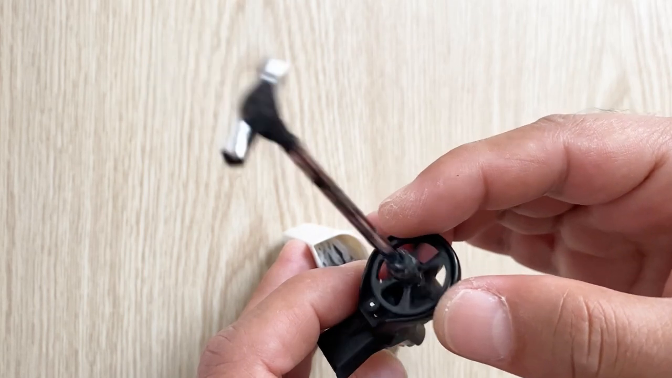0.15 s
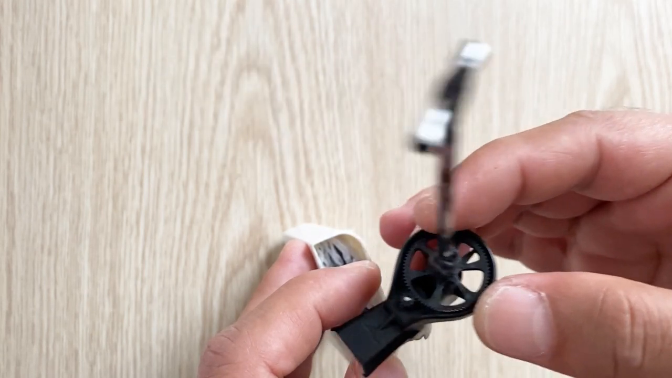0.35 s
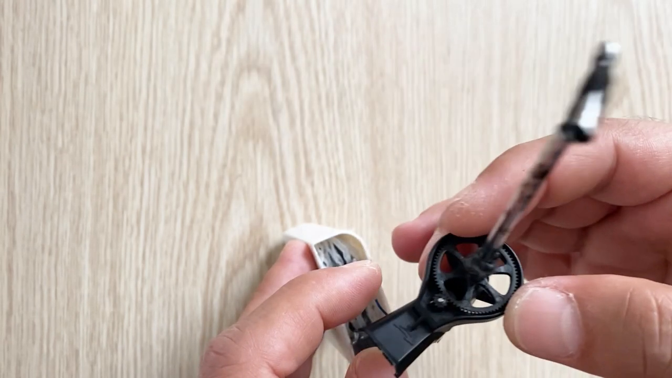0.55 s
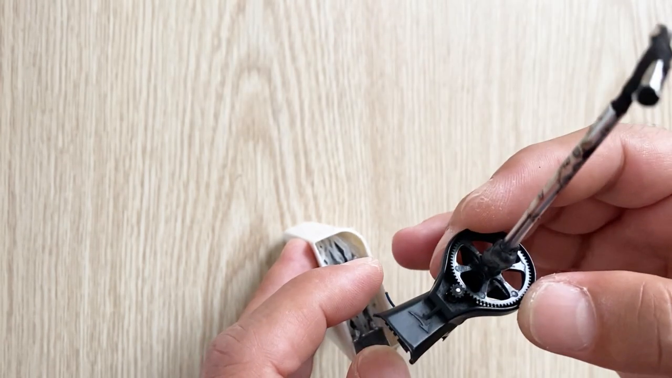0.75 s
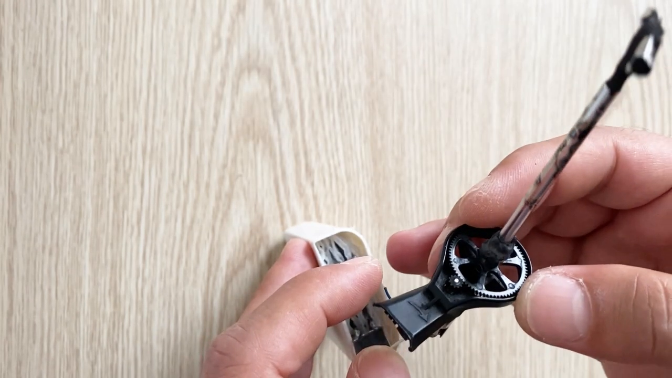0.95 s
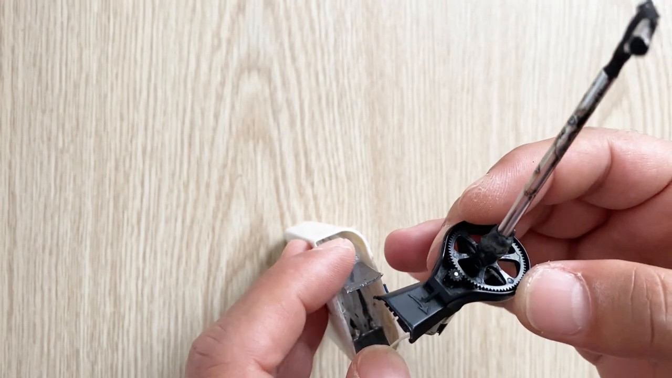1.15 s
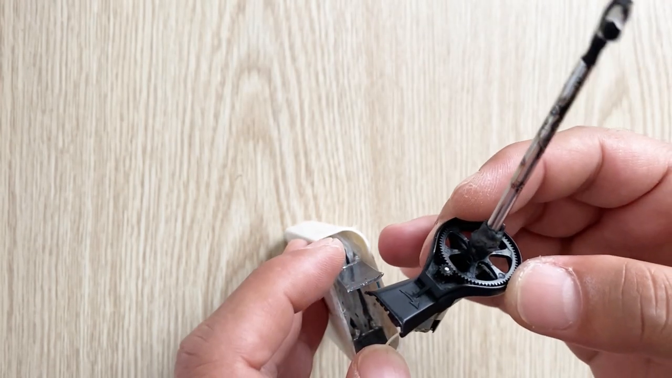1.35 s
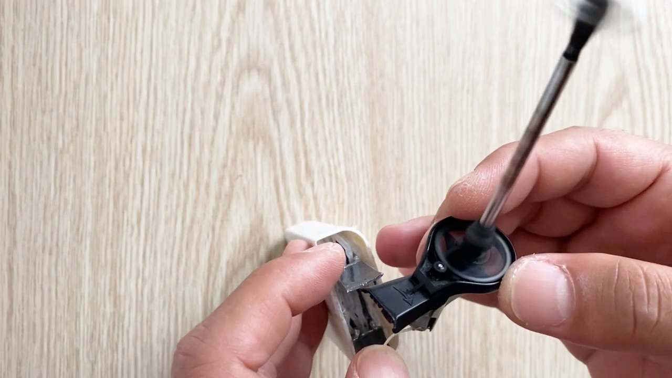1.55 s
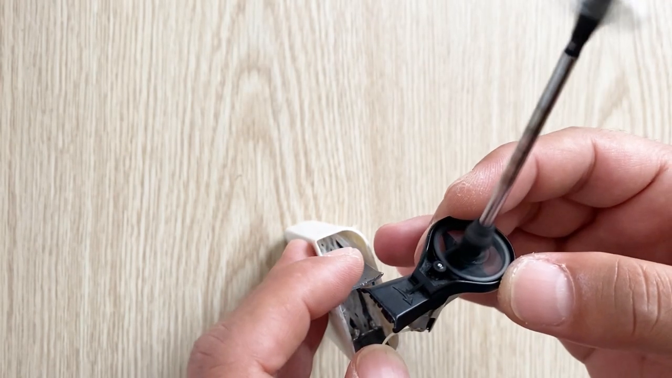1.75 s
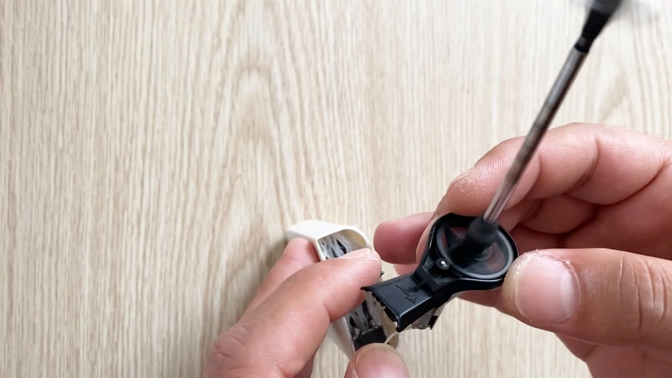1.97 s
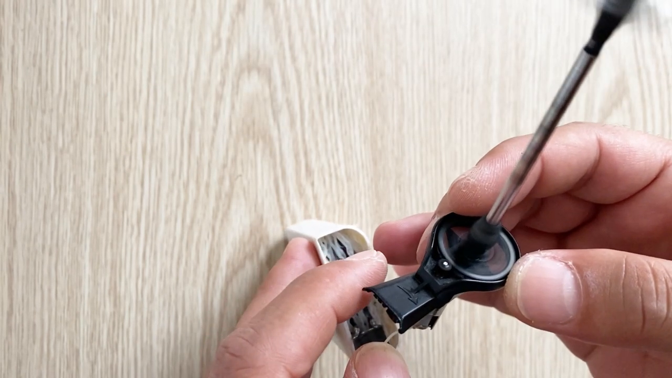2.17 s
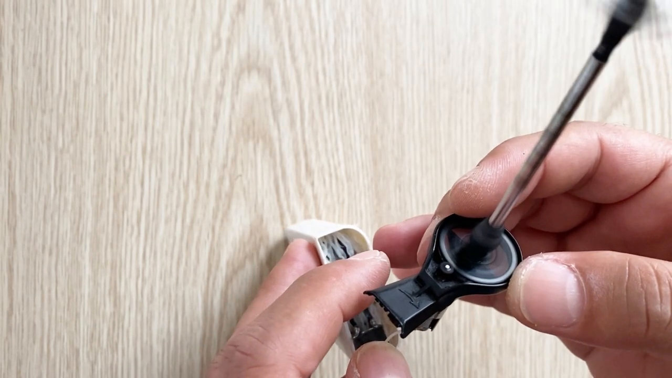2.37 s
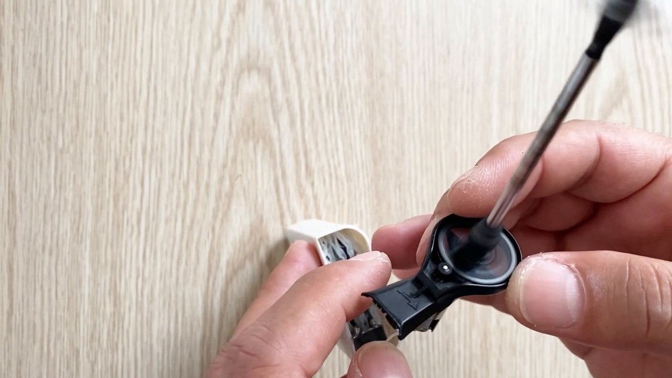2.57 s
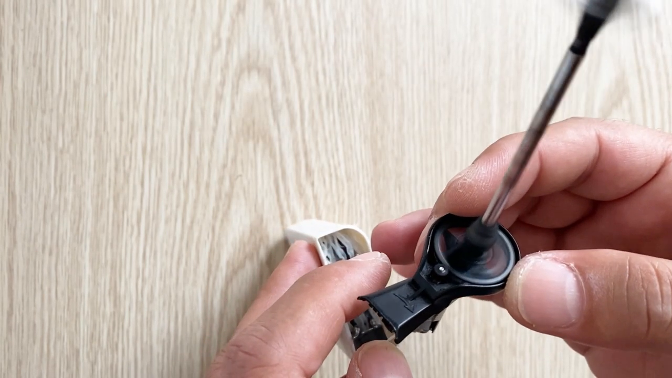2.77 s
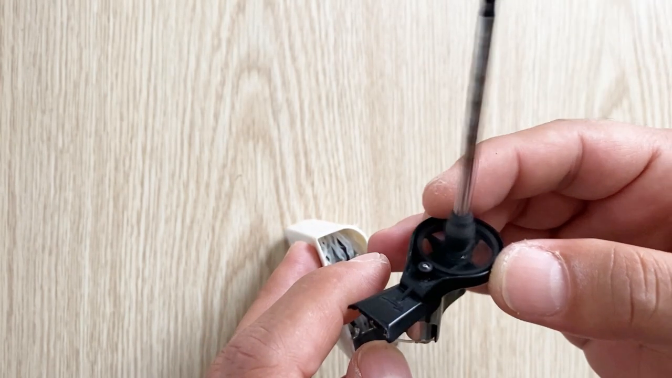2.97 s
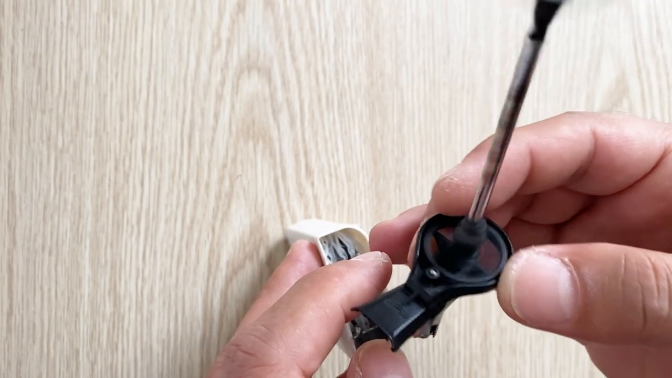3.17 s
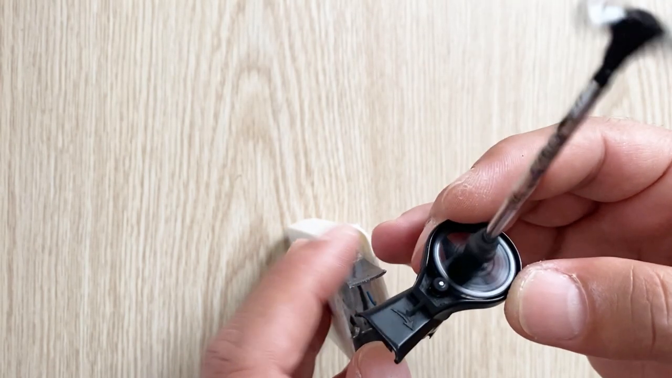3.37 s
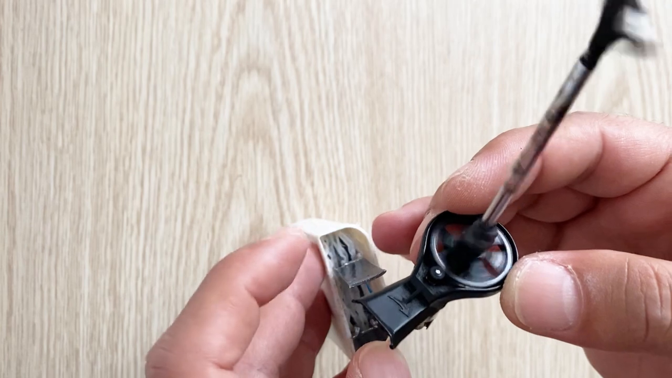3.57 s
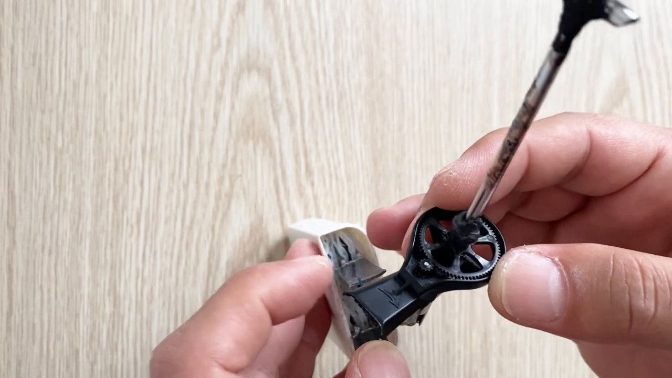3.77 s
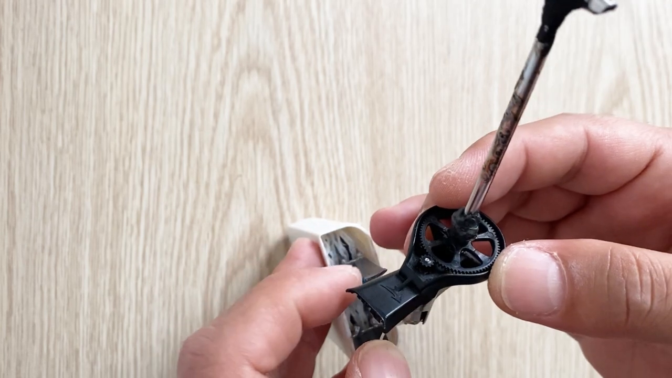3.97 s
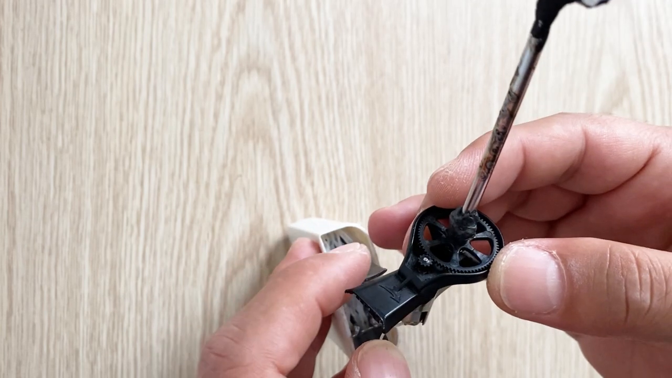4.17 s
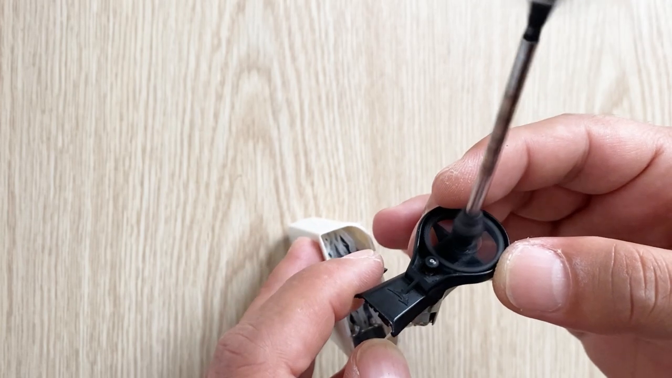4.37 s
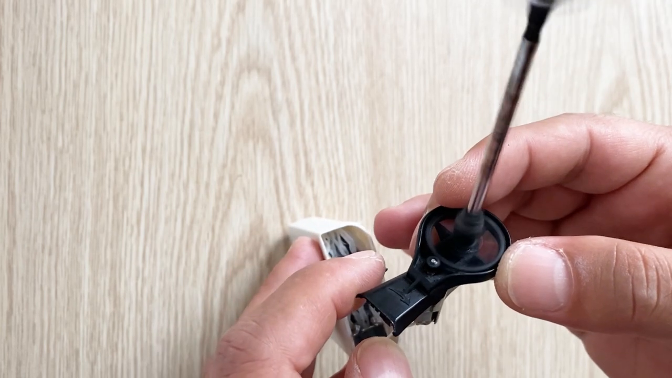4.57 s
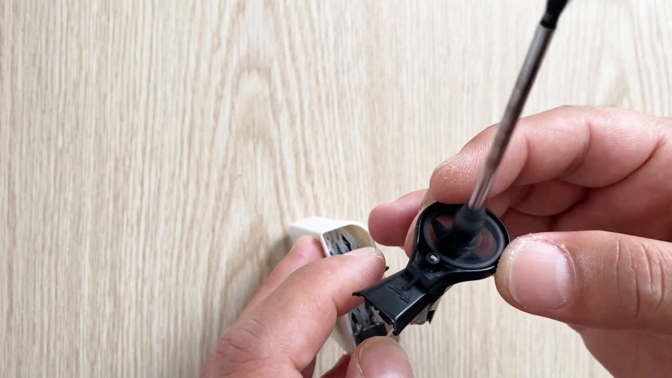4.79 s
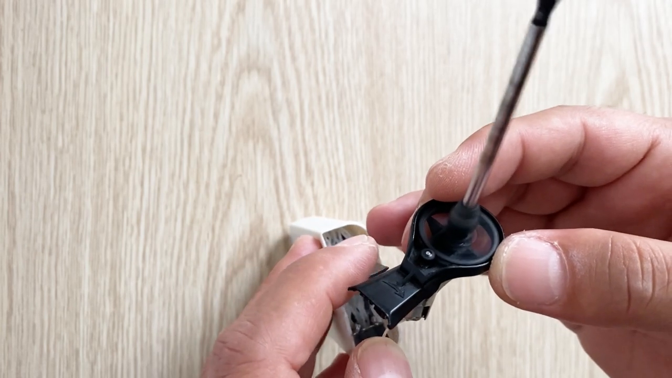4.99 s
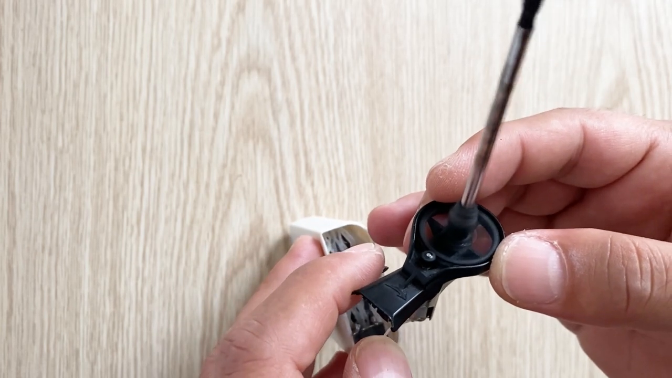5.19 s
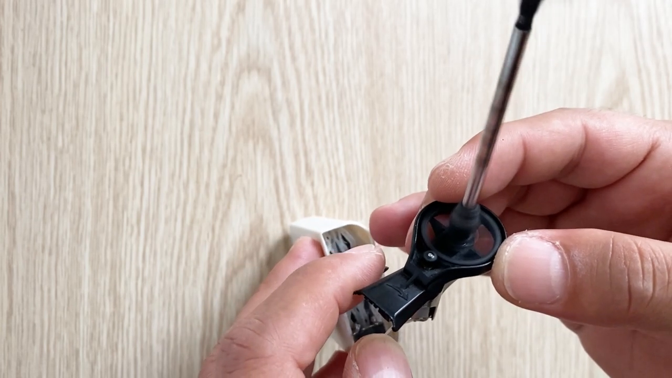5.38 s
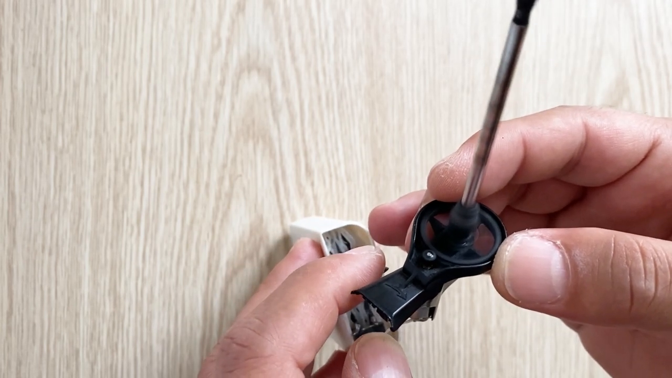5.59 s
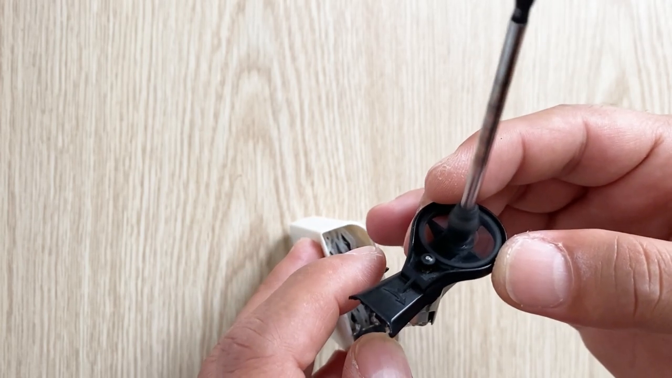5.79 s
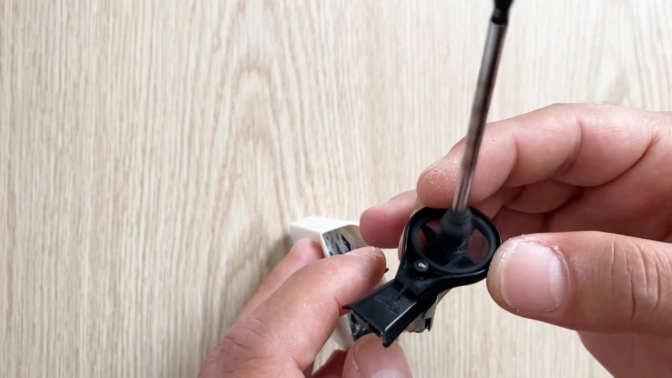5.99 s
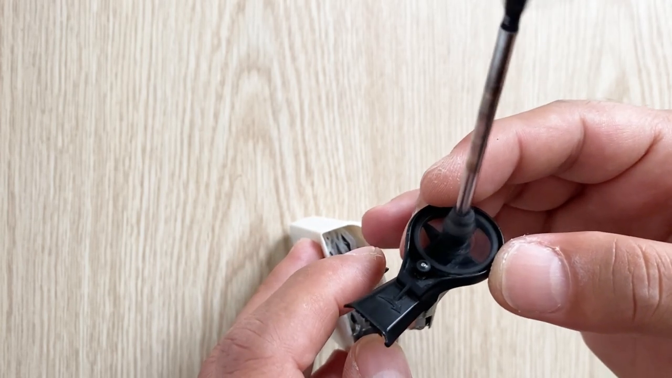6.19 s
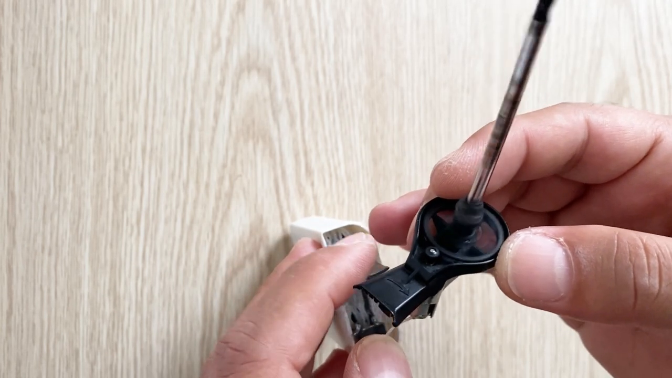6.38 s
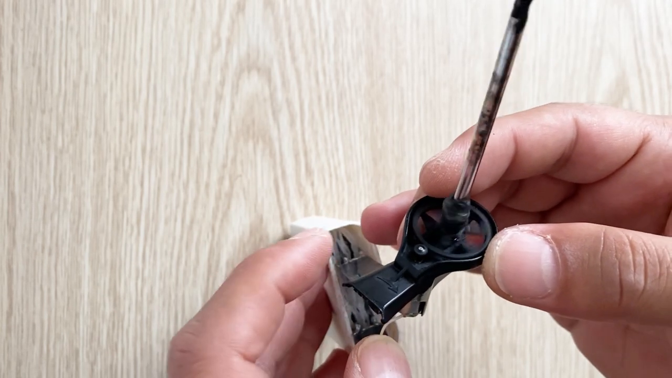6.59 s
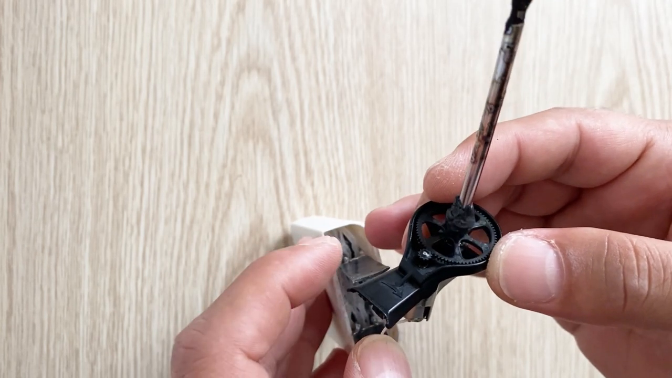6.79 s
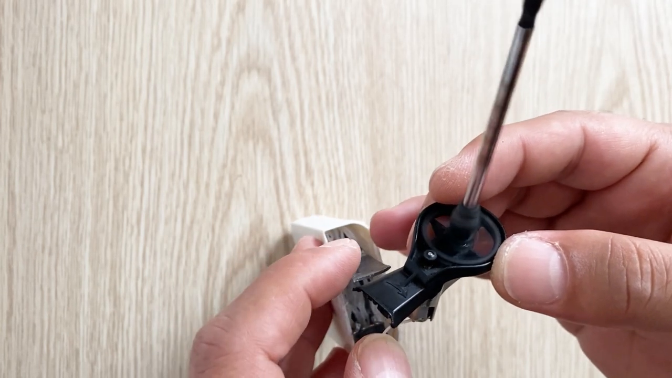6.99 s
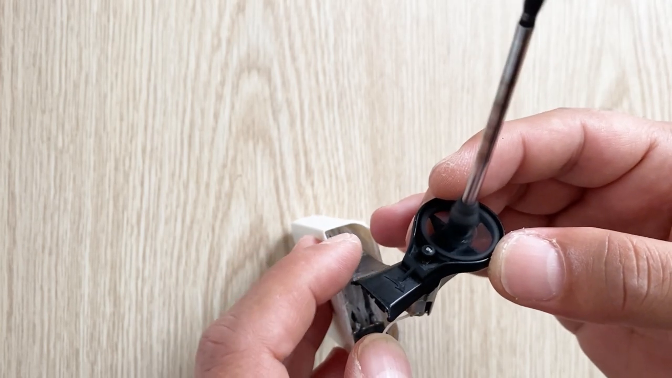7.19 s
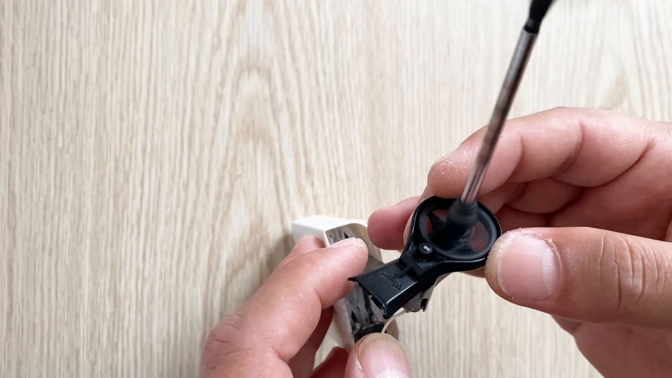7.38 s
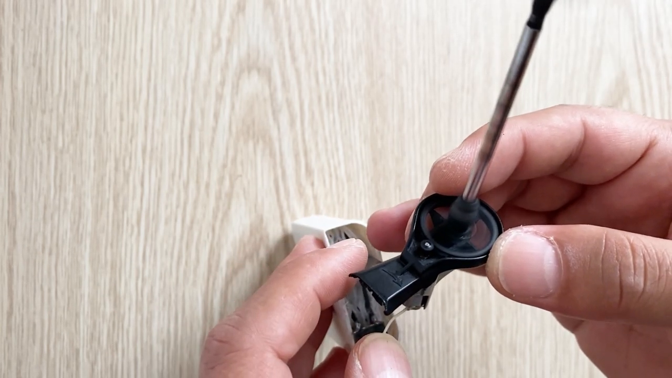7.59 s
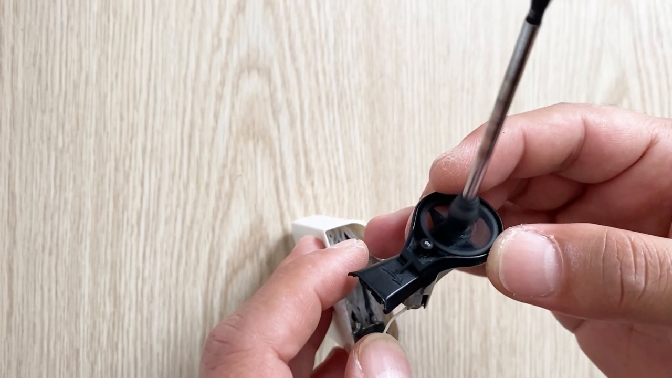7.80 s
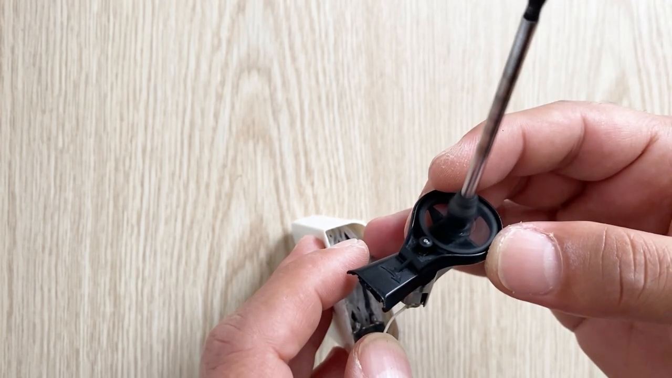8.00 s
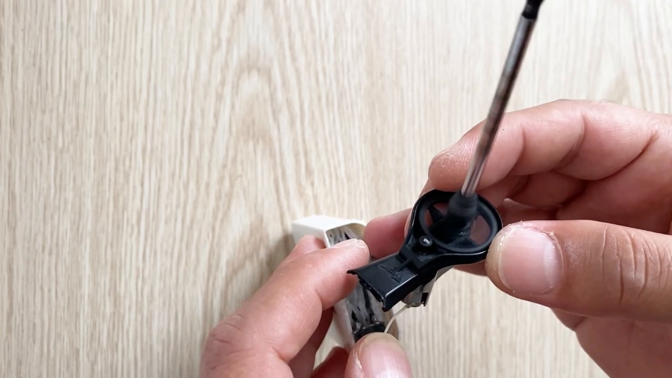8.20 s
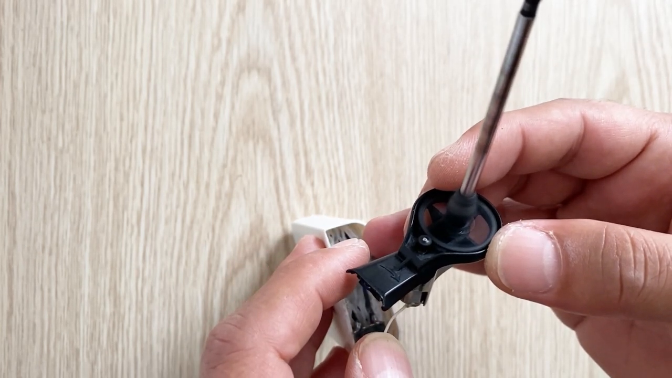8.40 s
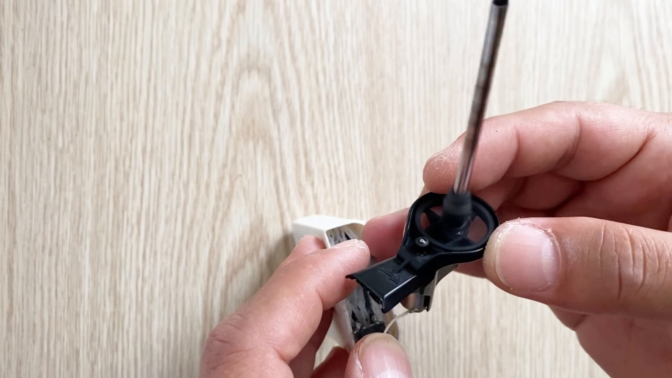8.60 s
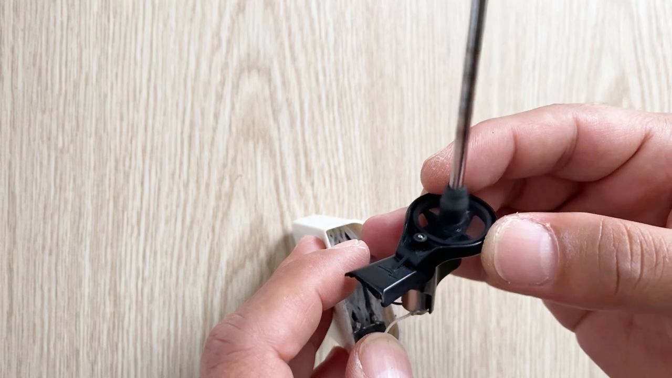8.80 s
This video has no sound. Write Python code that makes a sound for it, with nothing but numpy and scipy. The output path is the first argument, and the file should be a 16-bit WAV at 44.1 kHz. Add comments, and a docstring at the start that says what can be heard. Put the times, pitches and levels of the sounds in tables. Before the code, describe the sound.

A close, dry indoor sound of a tiny bare motor driving a plastic toy blender wheel. At 0 seconds there is a light scrape, then faint finger ticks over low room rumble until 1.4. The motor snaps on: bright gear hiss, dense clicking and whine pulse rapidly with the wobbling wheel, dipping near 1.6 and continuing to 2.65, with a short boost around 2.8. It coasts down, teeth knocking hard near 3.1, chattering slower to quiet by about 3.7 amid ticks and swelling rumble. A brief jerk at 4.3 and sharp knock near 4.5 lead to another run from 4.7, sagging, knocking at 5.1, then reviving from 5.2 to 5.75. It slows to a crawling rattle, with a scrape around 6.5. A nudge at 6.8 precedes the longest steady grinding whirr, 7.0 to 8.75, with a tiny dip near 8.5, before it begins slowing at the end.

```python
"""Toy blender gear drive

A tiny electric motor, held bare in the hands close by, spins a plastic crown wheel with a long blender shaft.
A finger works the battery contact: three runs, with dips and coasting stops, each following the wheel's speed.
The wheel wobbles, so its teeth, made of clicks, hiss and whining tones, grind on the pinion once a turn.
Knocks, scrapes and small handling ticks are fading noise bursts; low rumble and drone fill a small room."""
import sys
import numpy as np
from scipy import signal
from scipy.fft import rfft, irfft, next_fast_len
from scipy.io import wavfile
from scipy.ndimage import uniform_filter1d

SR = 44100
rng = np.random.default_rng(int(sys.argv[2]) if len(sys.argv) > 2 else 0)


def bounce(signal):
    """Save signal as a 16-bit WAV file at the path given by the first command-line argument."""
    frames = np.transpose(np.atleast_2d(signal))
    limited = np.clip(frames, -1, 1)
    pcm = np.round(limited * 32767).astype(np.int16)
    wavfile.write(sys.argv[1], SR, pcm)


N = 390285  # length in samples


def from_db(db):
    """Turn decibels into gain."""
    return 10 ** (np.asarray(db) / 20)


def rms_one(x):
    """Scale to an rms of 1."""
    return x / np.sqrt(np.mean(x ** 2) + 1e-20)


def in_time(rows, column):
    """Read one column of a table as a curve with a value at every sample."""
    rows = np.array(rows)
    return np.interp(np.arange(N) / SR, rows[:, 0], rows[:, column])


def drift(rate):
    """Wander at random with about `rate` new values a second, joined by straight lines; rms 1."""
    values = rng.standard_normal(N)
    return rms_one(np.interp(np.arange(N) / SR * rate, np.arange(N), values))


def colour(x, spectrum):
    """Filter by a smooth spectrum that falls steeply beyond both its ends; rms 1."""
    hz, db = np.transpose(spectrum)
    size = next_fast_len(N + 4096)
    log_hz = np.log(np.fft.rfftfreq(size, 1 / SR) + 1)
    beyond = np.abs(log_hz - np.clip(log_hz, np.log(hz[0]), np.log(hz[-1])))
    gain = from_db(np.interp(log_hz, np.log(hz), db) - 60 * beyond)
    return rms_one(irfft(rfft(x, size) * gain, size)[..., :N])


def resonate(x, modes):
    """Let each resonance in turn ring on top of what passes through; a wider one dies sooner; rms 1."""
    for hz, width, boost_db in modes:
        r = np.exp(-np.pi * width / SR)
        feed = np.array([1, 0, -1]) * (1 - r * r) / 2
        ring = [1, -2 * r * np.cos(2 * np.pi * hz / SR), r * r]
        peak = signal.lfilter(feed, ring, x + 1e-18)
        x = x + (from_db(boost_db) - 1) * peak
    return rms_one(x)


def ambient(spectrum, side_db):
    """Stereo noise: a part shared by both sides plus a part that is opposite on them."""
    mid, side = rng.standard_normal((2, N))
    return colour(mid + from_db(side_db) * side * np.array([[1], [-1]]), spectrum)


# How the room background swells and sinks.
# Each row: time in seconds, rumble level in dB, drone level in dB, both before a small trim.
BACKGROUND_LEVELS = [(0.3, -68.5, -62), (1.08, -59, -54.5), (2.3, -59.5, -59), (3.7, -52.5, -43.5),
                     (4.06, -58, -52), (4.92, -56, -54), (5.06, -52.5, -60), (5.32, -59, -58.5),
                     (8.85, -65.5, -60.5)]
# The noise colours of the background, from deep drone to hiss.
# Each row of these four: frequency in Hz, relative level in dB.
DRONE_COLOUR = [(24, -27), (36, -3.5), (52, 1), (64, -6), (78, 1), (100, -9), (122, -16.5)]
RUMBLE_COLOUR = [(105, 0.5), (125, -5), (155, 0.5), (200, -5), (262, 0.5), (290, -5.5), (335, -18),
                 (420, -20)]
RUSH_COLOUR = [(250, -1.5), (400, -7), (700, -9), (1100, -25.5), (2000, -32.5), (5000, -47.5)]
HISS_COLOUR = [(500, 2), (2000, -4), (5500, -8), (7200, -14.5), (9000, -9.5), (12000, -11), (13500, -15.5),
               (16000, -11.5)]
# Low resonances of the room. Each row: frequency in Hz, width in Hz, boost in dB.
ROOM_RESONANCES = [(73.7, 1.7, 8), (92, 12, 11), (143.3, 21, 3), (169.8, 5.2, 10.5), (204.6, 13, 7),
                   (229, 2.8, 8), (253.6, 6.5, 6)]


def background():
    """Noise shaped into rumble, drone and soft rush, which swell and sink over a steady faint hiss."""
    rumble_db, drone_db = in_time(BACKGROUND_LEVELS, 1), in_time(BACKGROUND_LEVELS, 2)
    rumble = from_db(rumble_db + 1.54) * resonate(ambient(RUMBLE_COLOUR, side_db=-19.0), ROOM_RESONANCES)
    drone = from_db(drone_db - 0.17) * resonate(ambient(DRONE_COLOUR, side_db=-31), ROOM_RESONANCES)
    rush = from_db(rumble_db - 17.0) * ambient(RUSH_COLOUR, side_db=-3.0)
    hiss = from_db(-86.0) * ambient(HISS_COLOUR, side_db=0)
    return rumble + drone + rush + hiss


def room(x, t60, wet_db):
    """A short diffuse tail of fading noise, different at each side; it falls by 60 dB in t60 seconds."""
    t = np.arange(SR // 2) / SR
    tail = rng.standard_normal((2, len(t))) * from_db(-60 * t / t60) * (t > .002)
    tail /= np.sqrt(np.sum(tail ** 2, axis=1, keepdims=True))
    return from_db(wet_db) * signal.fftconvolve(x[None], tail, axes=1)[:, :N]


def hand_scatter(x):
    """The shifting hands scatter the sound: two very short tails trade places at random."""
    pose = 2 * drift(7)
    shares = np.cos(pose), np.sin(pose)
    return sum(share * room(x, t60=.02, wet_db=-11.0) for share in shares)


# How far the left side runs ahead of the right.
# Each row: frequency in Hz, lead of the left in radians.
LEFT_LEAD = [(2200, 0), (2600, .6), (3700, .2), (5300, .1), (6000, 1.5), (6900, 2.9), (7900, 3.5),
             (9800, 6.0), (10900, 6.5), (13200, 9.2), (16000, 11.9)]


def left_first(x):
    """The treble reaches the left side before the right: half the lead forward, half backward."""
    size = next_fast_len(N + 4096)
    lead = np.interp(np.fft.rfftfreq(size, 1 / SR), *np.transpose(LEFT_LEAD))
    both_sides = np.exp(.5j * lead * np.array([[1], [-1]]))
    return irfft(rfft(x, size) * both_sides, size)[:, :N]


# Resonances of wheel and frame. Each row: frequency in Hz, width in Hz, boost in dB.
FRAME_RESONANCES = [(1935, 210, 2), (2508, 120, 8), (3372, 192, 10), (5063, 230, 6.5), (5724, 286, 13.5),
                    (6515, 110, 8.5), (6870, 120, 12.5), (7790, 390, 11), (9430, 170, 2.5),
                    (11920, 680, 7.5), (13210, 394, 9.5), (14520, 630, 7)]


def taps(events, spectrum, level_db):
    """Brief plastic contacts: noise bursts that start at once, fade, and ring through the frame."""
    fade, t = np.zeros(N + SR), np.arange(SR // 8) / SR
    for start, db, fading in events:
        at = max(int(start * SR), 0)
        fade[at:at + len(t)] += from_db(db + level_db) * np.exp(-t / max(fading, 1e-4))
    fade = fade[:N]
    bursts = colour(fade * rng.standard_normal(N), spectrum)
    # the filters set the rms to 1, so the rms of the fades is put back
    return np.sqrt(np.mean(fade ** 2)) * resonate(bursts, FRAME_RESONANCES)


# Fingers shift the parts.
# Each row: start in seconds, level in dB before a trim, fading time in seconds.
FINGER_TICKS = [(0.4055, -60, 0.0073), (0.4983, -66, 0.0045), (0.7517, -60.5, 0.006),
                (1.0144, -59.5, 0.006), (1.1992, -63, 0.006), (1.2226, -49.5, 0.0026),
                (1.2994, -60, 0.0041), (3.5693, -55, 0.004), (3.5912, -49.5, 0.0063), (3.621, -51, .004),
                (3.6544, -59, 0.0039), (3.7744, -64, 0.0079), (4.0744, -63, 0.018), (6.7044, -65, 0.008)]
# The colour of these ticks. Each row: frequency in Hz, relative level in dB.
TICK_SPECTRUM = [(1000, -23), (2500, -18), (3500, -5), (5500, -14), (7200, -10), (8600, 7.5), (10500, -6),
                 (13000, -11), (16000, -6)]


def handling_ticks():
    """Small plastic ticks as fingers shift the parts: short bursts with a bright peak."""
    return taps(FINGER_TICKS, TICK_SPECTRUM, level_db=-7.5)


# The wheel, nudged or jerked from rest, scrapes over the pinion.
# Each row: start in seconds, level in dB before a trim, fading time in seconds.
WHEEL_SCRAPES = [(0.0, -42.5, 0.028), (.094, -52.5, 0.026), (.15, -58, 0.0092), (1.397, -32.5, 0.017),
                 (4.299, -34.5, 0.031), (6.513, -44, 0.03), (6.829, -40.5, 0.028)]
# Plastic teeth striking. Each row: frequency in Hz, relative level in dB.
TEETH_COLOUR = [(300, -30), (1200, -28), (2500, -21), (4200, -17.5), (5500, -12), (7000, -9), (8500, -4.5),
                (9800, 4), (12000, 1), (14000, -0.5), (15200, 3), (16000, -11.5)]
# Brushes and bearings heard through the frame. Each row: frequency in Hz, relative level in dB.
RASP_COLOUR = [(150, -13.5), (400, -5), (700, -9), (1150, -15), (1700, -3), (2200, -2), (3000, 1),
               (4200, -1), (6000, -12), (16000, -17)]


def scrapes():
    """The wheel scrapes over the pinion: bursts with the bright teeth and the duller frame in them."""
    bright = taps(WHEEL_SCRAPES, TEETH_COLOUR, level_db=-4.0)
    return bright + taps(WHEEL_SCRAPES, RASP_COLOUR, level_db=-14.0)


# A tooth catches hard. Each row: start in seconds, level in dB before a trim.
TOOTH_KNOCKS = [(2.5165, -14.5), (3.035, -15.5), (3.0787, -7.5), (3.1019, -16.5), (3.3111, -23.5),
                (3.3717, -35), (3.4356, -26.5), (3.466, -35.5), (4.308, -16.5), (4.469, -5), (4.4916, -14),
                (4.5489, -17.5), (5.1056, -10.5), (5.1303, -11.5), (5.154, -14.5), (6.1635, -20.5),
                (6.3062, -22), (6.373, -24)]


def knocks():
    """A tooth catches hard: a burst in the colour of the teeth that fades within milliseconds."""
    events = [(start, db, .0016) for start, db in TOOTH_KNOCKS]
    return taps(events, TEETH_COLOUR, level_db=-5.0)


# The finger works the battery contact.
# Each row: closes in seconds, opens in seconds, top speed the wheel nears in turns per second,
# spin-up time in seconds, drag afterwards per second.
BATTERY_CONTACTS = [(1.394, 1.587, 82.83, .01, 2.06), (1.72, 2.639, 90.88, .04, 1.16),
                    (2.77, 2.848, 75.82, .007, 2.18), (4.296, 4.352, 62.91, .023, 2.32),
                    (4.695, 4.786, 91.17, .02, 2.0), (5.2, 5.445, 87.24, .021, 1.16),
                    (5.48, 5.754, 88.27, .04, 1.96), (6.828, 6.877, 67.37, .01, 1.82),
                    (7.02, 8.464, 90.85, .034, 1.63), (8.5, 8.746, 88.96, .037, 2.29)]
FRICTION_TURNS_PER_S2 = 24  # dry friction, the same at any speed


def wheel_speed():
    """Turns per second: with current the wheel nears its top speed; without, drag and dry friction brake it."""
    t, speed = np.arange(N) / SR, np.zeros(N)
    for closes, opens, top, spin_up, drag in BATTERY_CONTACTS:
        on, off = int(closes * SR), int(opens * SR)
        friction = FRICTION_TURNS_PER_S2 / drag
        speed[on:] = top + (speed[on] - top) * np.exp((closes - t[on:]) / spin_up)
        coasting = (speed[off] + friction) * np.exp(drag * (opens - t[off:])) - friction
        speed[off:] = np.maximum(coasting, 0)
    return speed


# Mostly, the faster the wheel, the louder.
# Each row: speed in turns per second, tooth rattle in dB, frame rasp in dB, both before grip and trims.
LOUDNESS_BY_SPEED = [(4, -79, -82), (7.06, -78.5, -75), (13.6, -60.5, -66.5), (20.5, -41.5, -53),
                     (34.3, -33, -53), (61, -30.5, -49), (90.4, -26, -46)]
# The hands press the wheel against the pinion more or less firmly.
# Each row: time in seconds, extra rattle in dB, extra rasp in dB.
HAND_GRIP = [(1.45, -.5, -2), (2.0, -2, -2), (2.7, -1, -1), (3.15, -1, -1.5), (4.4, -.5, 0),
             (5.1, 0.5, -1.5), (5.7, 1.5, 0), (6.1, -2.5, -1.5), (7.2, 1, 1.5), (8.8, 0, -0.5)]
TAKE_UP_S = .016  # the gain follows with this delay, so the teeth take a moment to bear fully
SILENT_BELOW = 4.3  # turns per second at which the teeth slip by unheard


def drive_gain(speed, column):
    """Loudness of rattle (column 1) or rasp (column 2): it follows speed and grip, a little late."""
    law = np.array(LOUDNESS_BY_SPEED)
    level_db = np.interp(speed, law[:, 0], law[:, column]) + in_time(HAND_GRIP, column)
    gain = from_db(level_db) * (speed > SILENT_BELOW)
    r = np.exp(-1 / (TAKE_UP_S * SR))
    return signal.lfilter([1 - r], [1, -r], gain + 1e-18)


def pressure(turns, depth_db, sharpness, uneven_db):
    """The wobbling wheel presses on the pinion once a turn, never quite alike; mean power about 1."""
    lobe = lambda angle: np.exp(sharpness * (np.cos(2 * np.pi * angle) - 1))
    # mean power over one turn for each depth, used to even out the loudness
    depths = np.arange(40)
    power = np.mean(from_db(depths[:, None] * lobe(np.arange(64) / 64)) ** 2, axis=1)
    each_turn = rng.uniform(-1.3, 1.3, N)[np.round(turns).astype(int)]
    press = from_db((depth_db + uneven_db * each_turn) * lobe(turns))
    return press / np.sqrt(np.interp(depth_db, depths, power))


WHEEL_TEETH, PINION_TEETH = 70, 11


def rotor_hum(turns, fast):
    """The rotor's unbalance hums once a motor turn, growing steeply with speed."""
    unsteady = from_db(2.3 * drift(25))
    motor = turns * WHEEL_TEETH / PINION_TEETH
    return from_db(-67.5) * fast ** 2 * unsteady * np.sin(2 * np.pi * motor)


def tooth_contacts(turns, fast, spectrum, wear, slide_db):
    """Every tooth lands with a click, partly set by its own wear and so alike each turn, then slides with a hiss."""
    tooth = np.floor(turns * WHEEL_TEETH).astype(int)
    lands = np.diff(tooth, prepend=0) > 0
    own = rng.uniform(-1.22, 1, WHEEL_TEETH)[tooth % WHEEL_TEETH]
    clicks = lands * (wear * own + rng.uniform(-1.31, 1, N))
    # level out the clicks, so that sparse and dense ones are about equally loud
    clicks = clicks / np.sqrt(uniform_filter1d(clicks ** 2, size=1200) + 1e-4)
    slide = from_db(slide_db) * np.sqrt(.2 + .8 * fast) * rng.standard_normal(N)
    return resonate(colour(clicks + slide, spectrum), FRAME_RESONANCES)


# Whine of the eleven-tooth pinion. Each row: multiple of the motor speed, relative level in dB.
WHINE_TONES = [(8, -12.5), (9, -20.5), (10, -11), (11, 1), (12, -10.5), (20, -24.5), (21, -3), (22, -2),
               (23, -14.5), (33, -9)]


def pinion_whine(turns, play, play_hz, lowest_hz):
    """Mesh tone, its overtones and side tones, blurred by play between the teeth; small parts radiate no bass."""
    motor = turns * WHEEL_TEETH / PINION_TEETH
    tones = 0
    for multiple, db in WHINE_TONES:
        blurred = motor + play * drift(play_hz)  # play in motor turns
        tones = tones + from_db(db) * np.sin(2 * np.pi * round(multiple) * blurred)
    no_bass = signal.butter(6, lowest_hz, "high", fs=SR, output="sos")
    return resonate(signal.sosfilt(no_bass, tones), FRAME_RESONANCES)


WAVER_TURNS, WAVERS_PER_S = .024, 12  # at full speed the wheel runs a little ahead and behind


def gears():
    """Speed sets the pitch, the beat of the wobble and how much the mesh sings; slow teeth part between beats."""
    speed = wheel_speed()
    fast = np.clip(speed / 90, 0, 1)
    turns = np.cumsum(speed) / SR + WAVER_TURNS * fast ** 2 * drift(WAVERS_PER_S)
    # the wobble only throws the wheel about once it spins
    spinning = np.clip(speed / 19, 0, 1) ** 2
    press = pressure(turns, spinning * (21.5 - 10.0 * fast ** 2), sharpness=1.66, uneven_db=1.65)
    sway = pressure(turns, spinning * np.clip(14.0 - 25.5 * fast, 0, 30), sharpness=1.0, uneven_db=-1.0)
    # near standstill the teeth catch and slip in uneven jerks
    crawling = np.clip(1 - speed / 36, 0, .7)
    jerks = from_db(crawling * (9 * np.clip(drift(170), -1.6, 1.6) - 4))
    rattle = from_db(-2.0 * fast) * tooth_contacts(turns, fast, TEETH_COLOUR, wear=0.81, slide_db=-3.5)
    # the mesh sings only while the wheel bears on the pinion
    bite = pressure(turns, 22 * spinning, sharpness=1.1, uneven_db=.6)
    singing = from_db(-16.5 + 9.77 * fast ** 6)
    whine = singing * bite * pinion_whine(turns, play=0.01, play_hz=601, lowest_hz=2040)
    rasp = from_db(-1.5) * tooth_contacts(turns, fast, RASP_COLOUR, wear=0.91, slide_db=0.0)
    mesh = drive_gain(speed, 1) * (press * rattle + whine)
    frame = drive_gain(speed, 2) * sway * rasp
    return jerks * (mesh + frame) + rotor_hum(turns, fast)


def scene():
    """The gear drive and the handling, close up; the hands scatter the sound and the room adds a short tail."""
    blender = handling_ticks() + scrapes() + knocks() + gears()
    tail = room(blender, t60=0.11, wet_db=-30.5)
    return background() + tail + hand_scatter(blender) + left_first(blender)


CUTOFF_HZ = 15900


def record(dry):
    """Cut the top steeply, filtering forwards and backwards so that nothing is delayed."""
    steep = signal.ellip(10, .1, 70, CUTOFF_HZ, fs=SR, output="sos")
    return signal.sosfiltfilt(steep, dry)


dry = scene()
out = record(dry)
bounce(out)
```